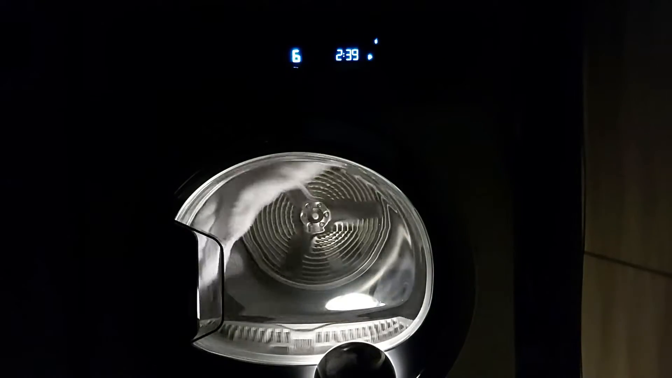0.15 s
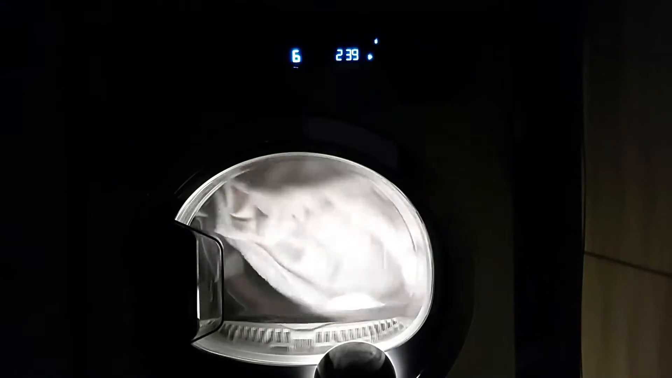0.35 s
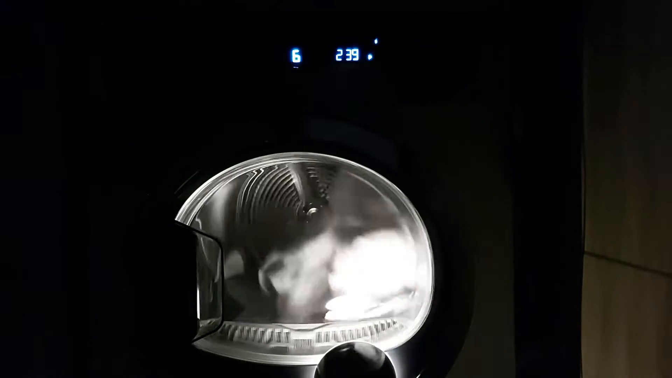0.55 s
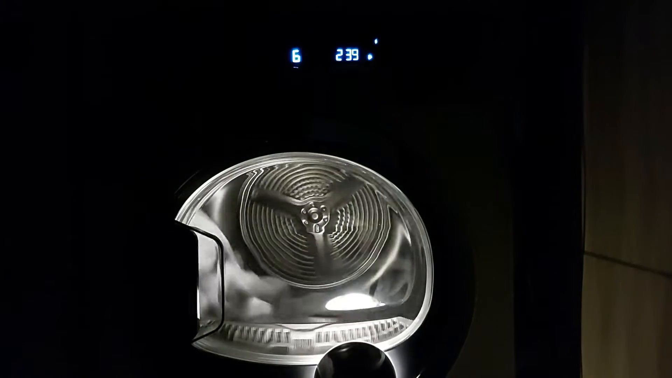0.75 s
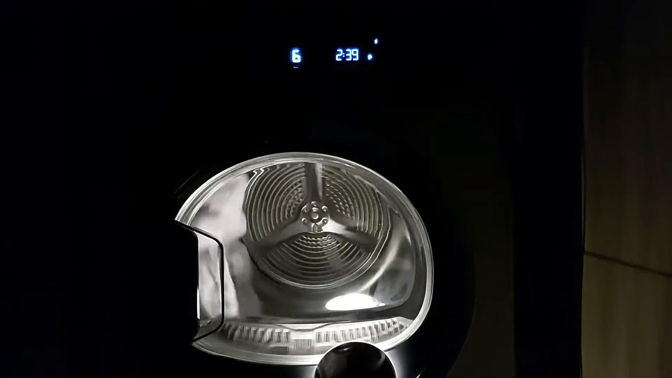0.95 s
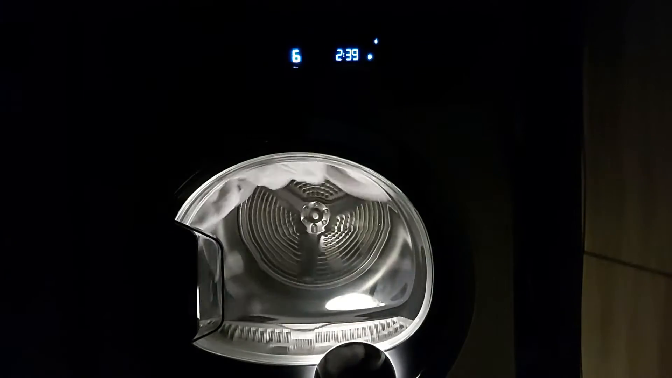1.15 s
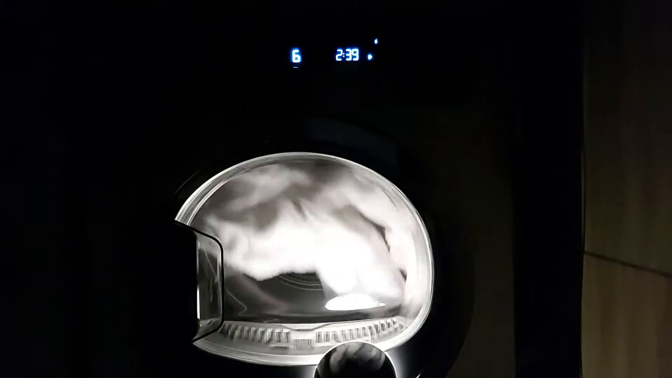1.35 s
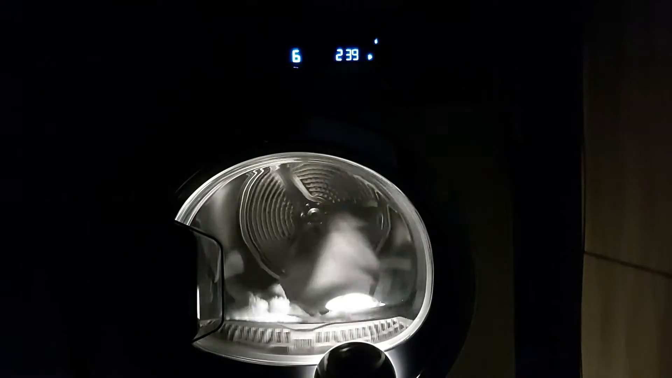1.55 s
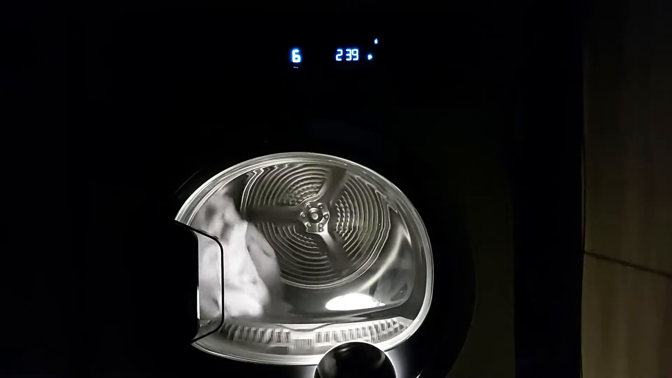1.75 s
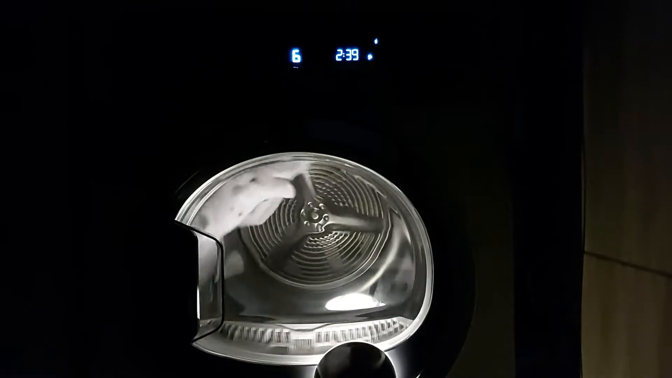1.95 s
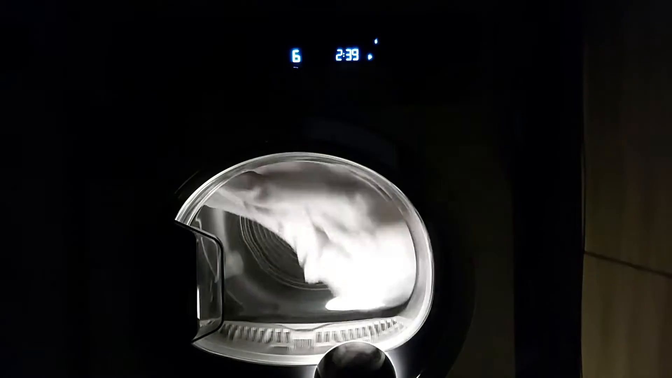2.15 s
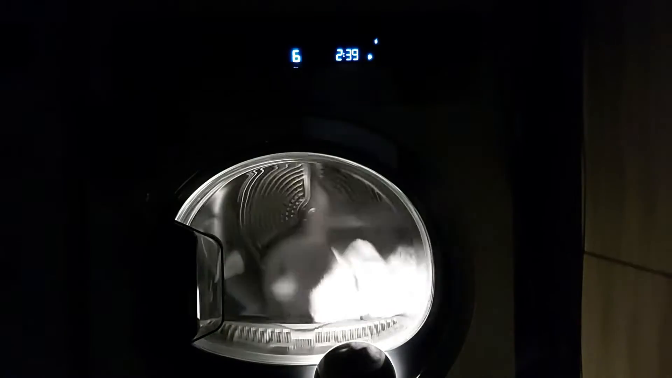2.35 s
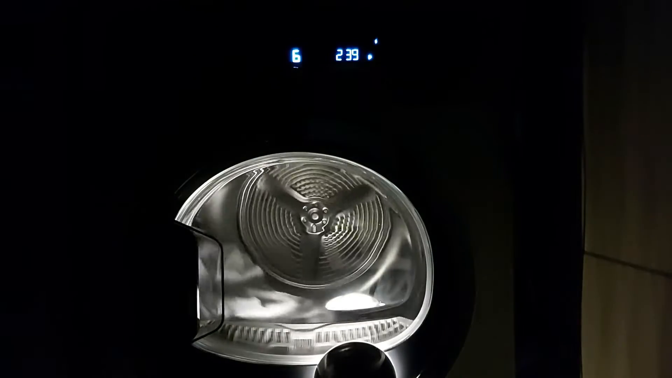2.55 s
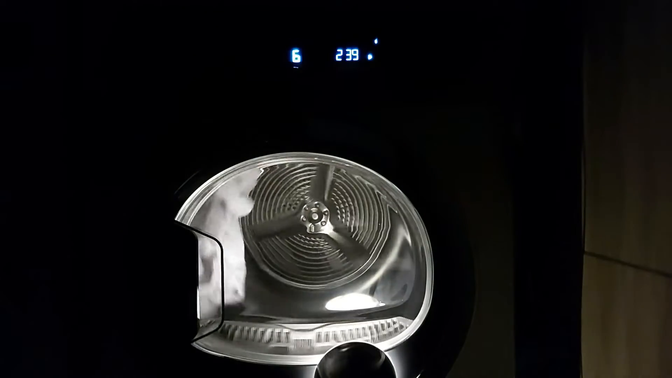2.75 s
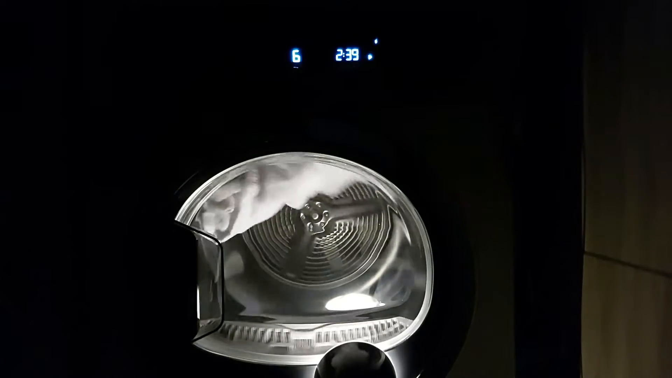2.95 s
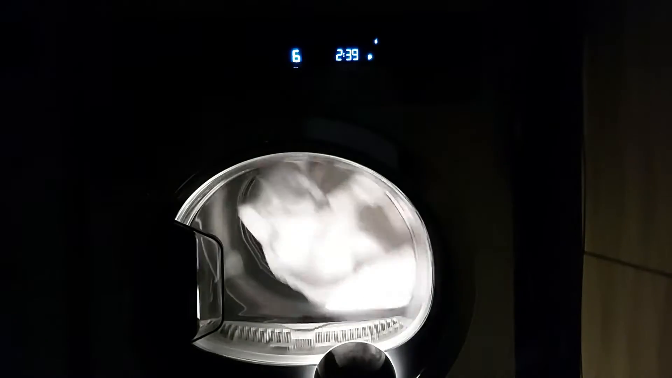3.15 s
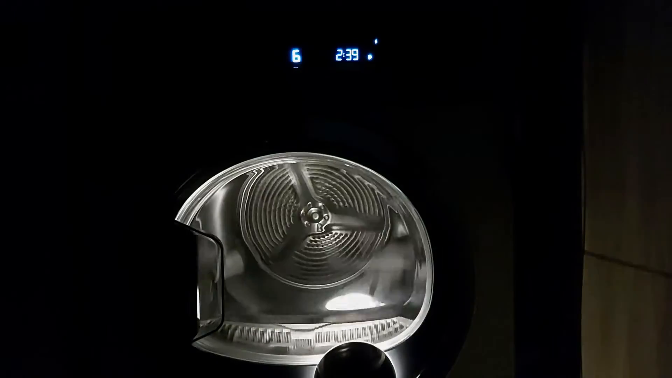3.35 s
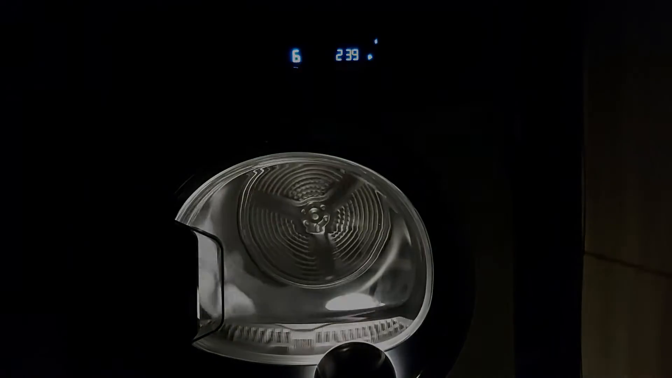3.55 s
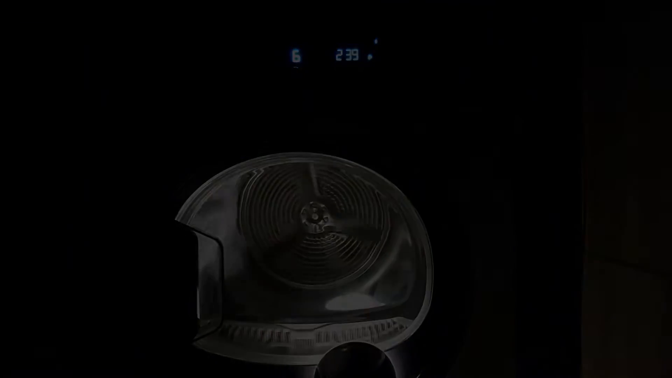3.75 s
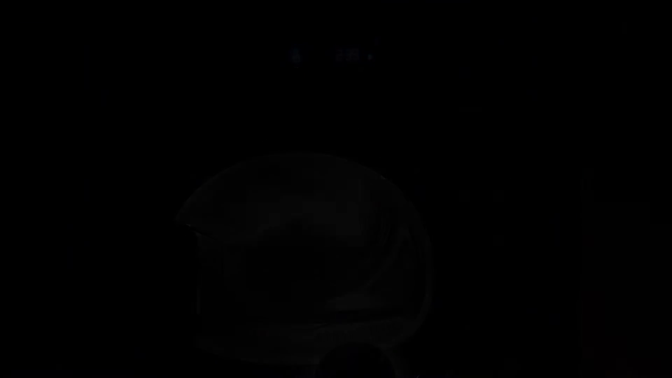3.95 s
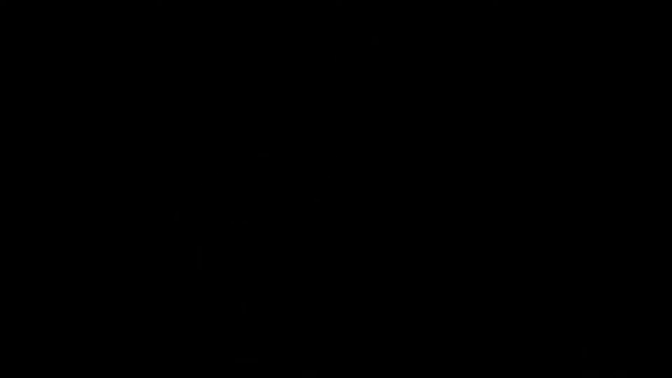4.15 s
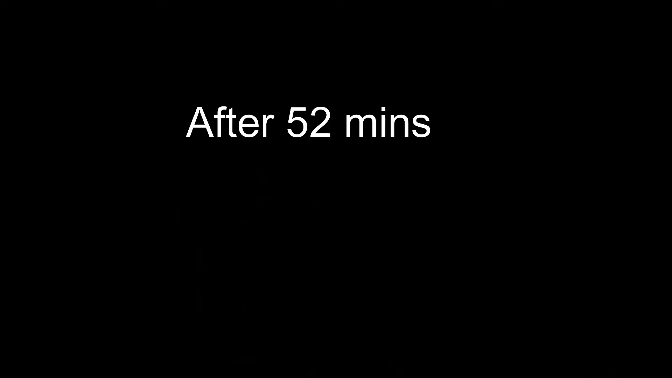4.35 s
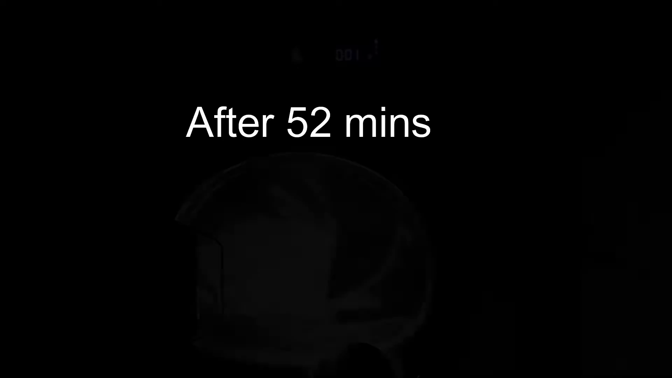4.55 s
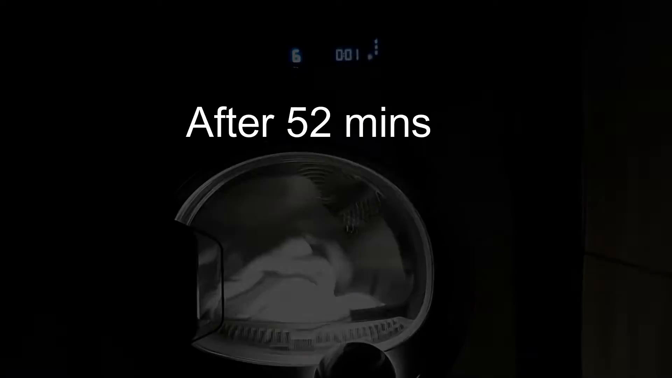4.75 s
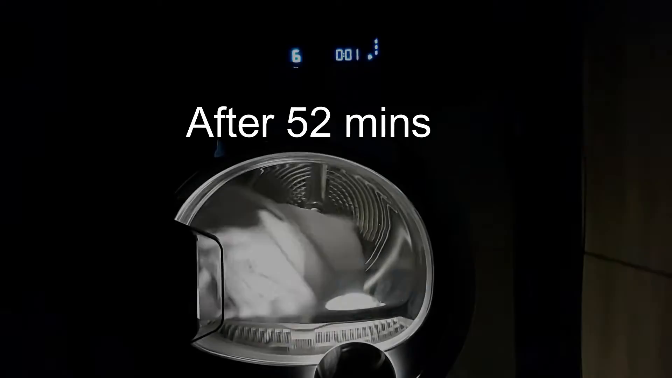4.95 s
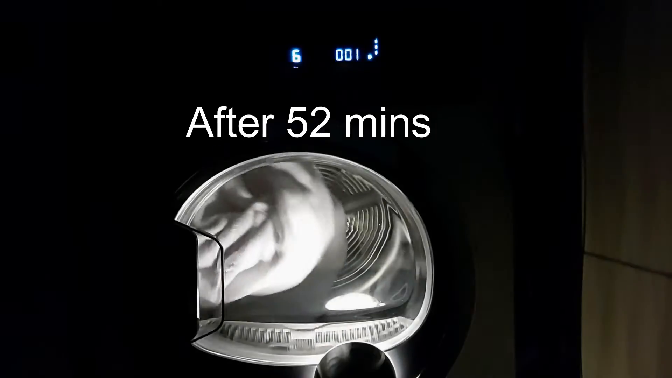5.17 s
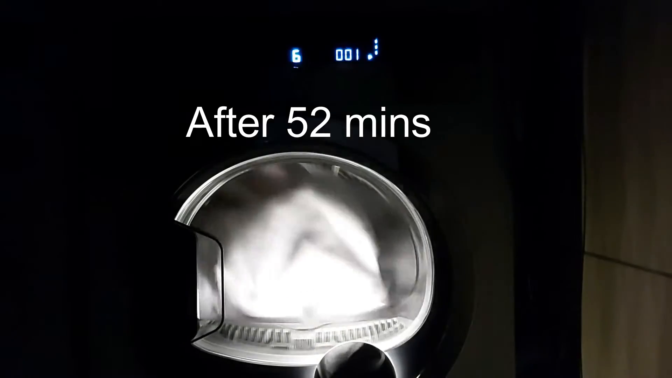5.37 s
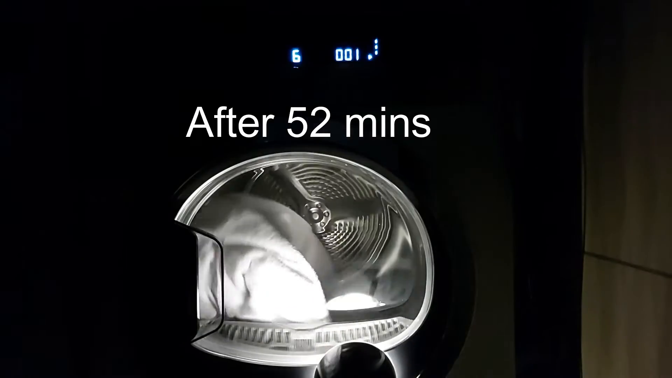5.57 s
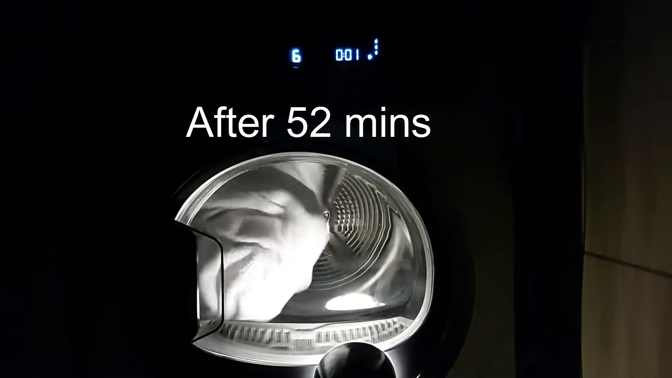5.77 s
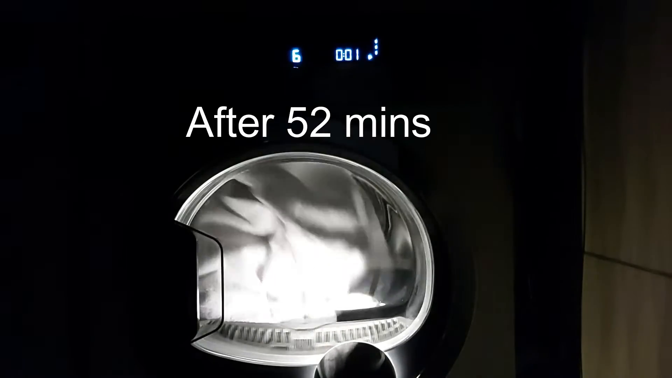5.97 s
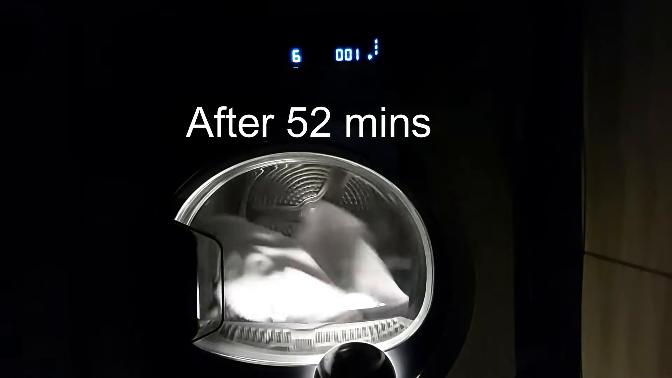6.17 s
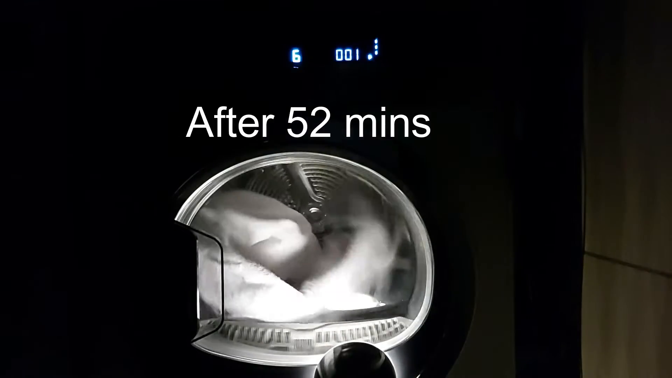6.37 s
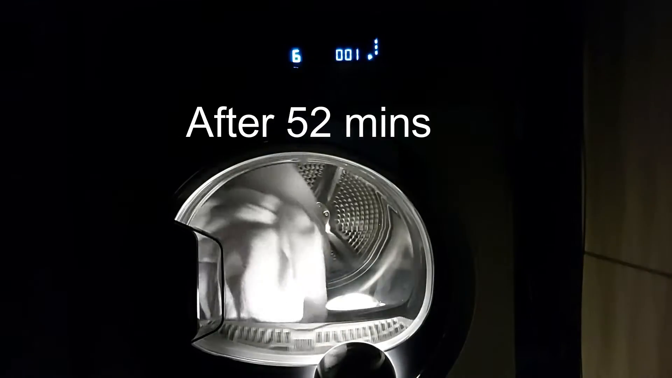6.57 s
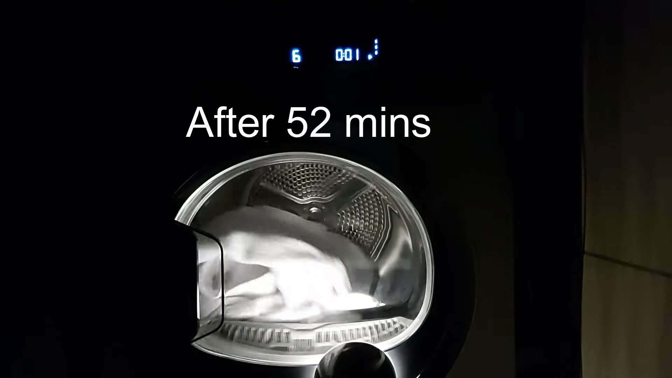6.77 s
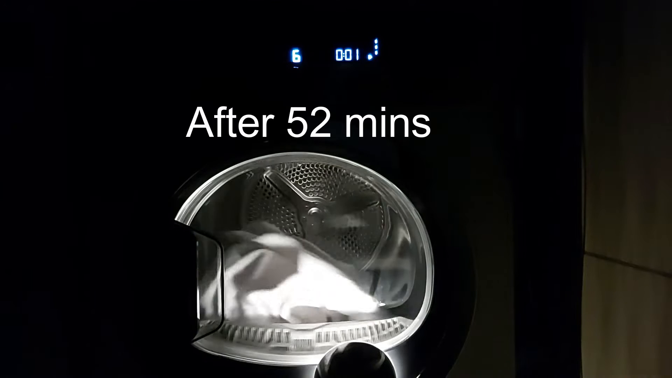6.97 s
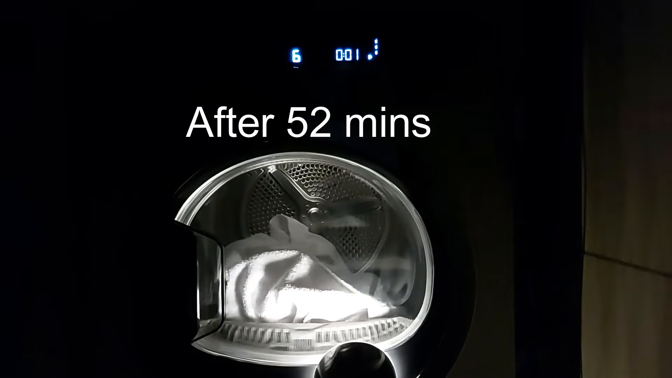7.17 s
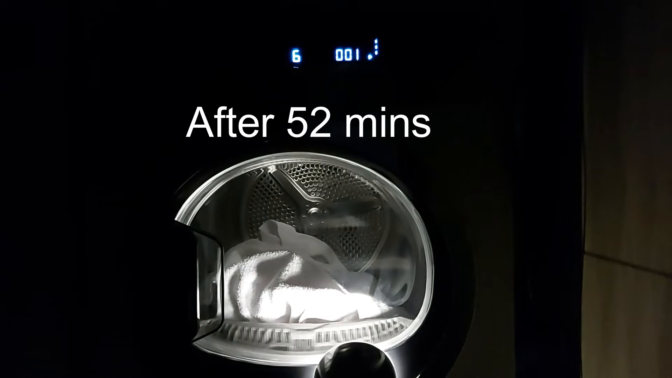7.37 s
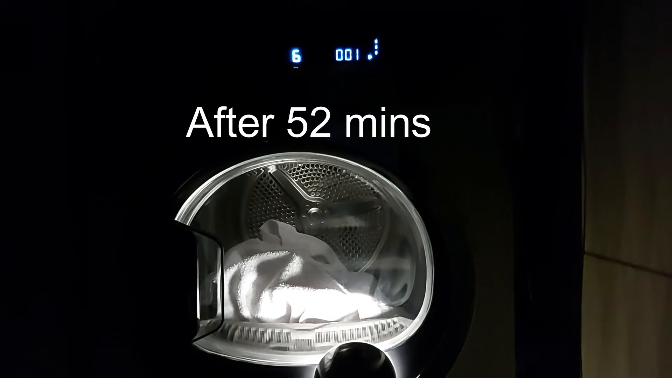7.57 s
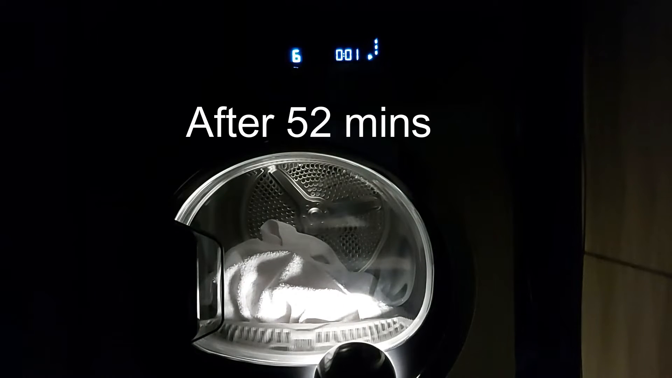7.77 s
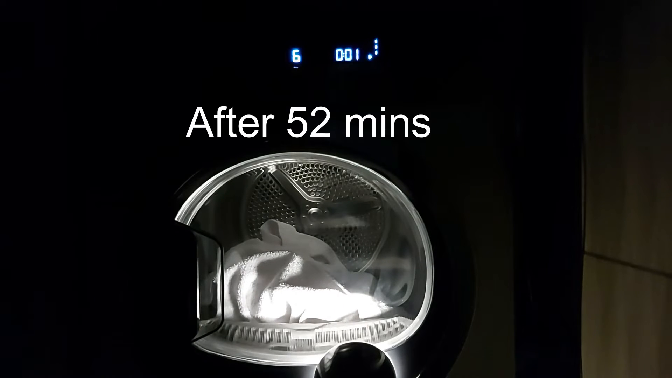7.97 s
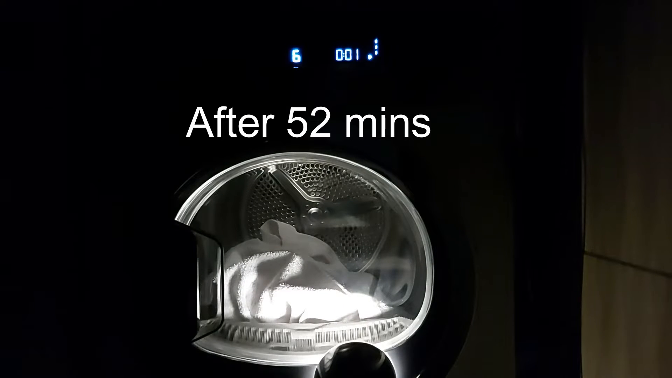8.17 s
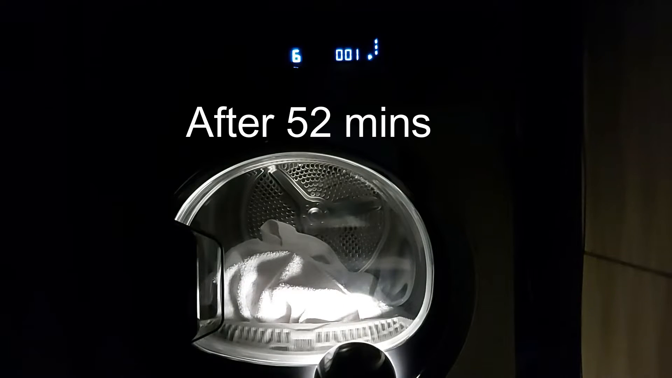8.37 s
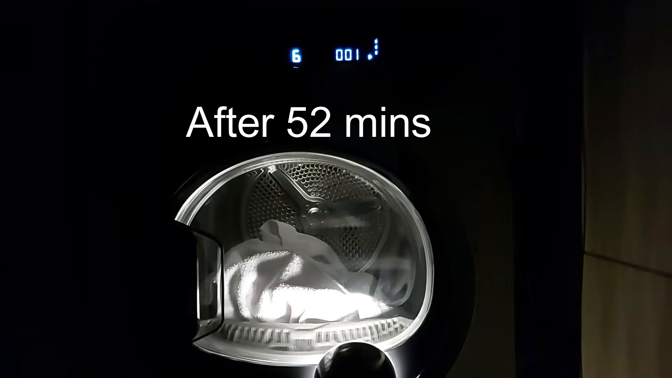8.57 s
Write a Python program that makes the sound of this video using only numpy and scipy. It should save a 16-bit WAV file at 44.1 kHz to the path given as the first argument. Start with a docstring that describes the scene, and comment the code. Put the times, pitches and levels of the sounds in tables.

```python
"""A tumble dryer runs in a small room: the drum shakes the cabinet, the fan drives air through ducts,
the motor whines and laundry thuds on the drum wall. The sound fades, breaks off briefly at 4.34 s
and resumes late in the cycle with more thuds. At 6.45 s the motor is switched off: drive whistles
converge, the load slides, drum and fan coast to rest. A faint hiss remains; cooling metal ticks."""
import sys
import numpy as np
from scipy import signal
from scipy.fft import rfft, irfft, next_fast_len
from scipy.io import wavfile

SR = 44100
rng = np.random.default_rng(int(sys.argv[2]) if len(sys.argv) > 2 else 0)


def log_audio(samples):
    """Write samples as a 16-bit WAV file to the path given in sys.argv[1]."""
    # one column per channel
    frames = np.atleast_2d(samples).T
    # limit to full scale, then quantise
    limited = np.clip(frames, -1, 1)
    pcm = np.round(limited * 32767).astype(np.int16)
    wavfile.write(sys.argv[1], SR, pcm)


N = 379877
TIME_S = np.arange(N) / SR

BREAK_S, RESUME_S = 4.342, 4.359  # early cycle before, late cycle after
DRIVE_ON_S, SWITCH_OFF_S, COAST_S, REST_S = 4.74, 6.45, 6.56, 7.33
SHAFT_HZ, SWITCHING_HZ, FAN_LAG_S = 48.89, 12231, 0.085

# cabinet and room resonances: freq_hz, width_hz, early_db, late_db
BOOM_MODES = [(38, 8, -17, -22.5), (50.3, 9.2, -14, -11), (74.9, 16, -4.5, -7.5), (101.76, 7.3, 0.5, 6.5),
              (122.1, 17.3, 0.5, 0.5), (150.3, 12, -13.5, -13.5)]
# boom swells as the load lurches: centre_s, level_db, half_length_s
LURCHES = [(5.9, -24, 0.095), (6.32, -20.5, 0.025), (6.6, -27, .06), (7.305, -54, 0.058)]
# air rush spectrum: freq_hz, density_db
RUSH_SPECTRUM = [(88, -33), (150, 0.5), (260, -2.5), (340, 0), (519, -9.5), (613, -4), (948, -9.5),
                 (1600, -14), (3200, -37.5), (4160, -77.5)]
# duct and drum resonances in the rush: freq_hz, width_hz, level_db
DUCT_MODES = [(192.3, 2.7, 5.5), (224.8, 16, 2), (301.6, 11.8, 2), (339.5, 38.5, 3), (436.6, 14, 2.5),
              (472.6, 11.6, 5), (696, 26.5, -0.5), (957, 9.4, 5.5)]
# hiss spectra (early, late, at rest), each: freq_hz, density_db
HISS_SPECTRA = [
    [(1470, -20.5), (2500, 3), (3090, -1), (5700, -3.5), (7100, -6.5), (12200, -8.5), (14500, -8.5)],
    [(1500, -18.5), (2500, 0), (3250, -6.5), (6430, -13), (10600, -20.5), (12300, -18), (14000, -22.5),
     (15500, -20)],
    [(700, -13.5), (2500, -7.5), (4100, -4.5), (11300, -4.5), (15500, -11)],
]
# hiss spectrum while coasting: freq_hz, density_db
COAST_SPECTRUM = [(1470, -31), (2500, -2), (3300, -14.5), (5900, -10.5), (6500, -10), (7200, -14.5),
                  (10100, -22), (12500, -13), (15700, -13.5)]
# hiss swells: centre_s, level_db, half_length_s
RUSTLES = [(5.66, -56, 0.3), (6.48, -53.5, 0.027)]
# hiss floor, heard at rest: time_s, level_db
HISS_FLOOR = [(7.33, -84), (7.96, -75), (8.04, -67), (8.61, -61.5)]
# laundry landings: start_s, level_db, length_s, treble_db, lowpass_hz
THUDS = [(1.653, -19.5, 0.067, -11, 1500), (1.708, -19, 0.023, -23, 900), (2.37, -30, 0.12, -10.5, 1500),
         (2.449, -26.5, 0.1, -17, 900), (4.624, -22, 0.09, -13.5, 1300), (4.77, -27, 0.079, -16, 1200),
         (4.899, -29.5, 0.061, -12.5, 1200), (5.548, -24, 0.054, -12, 880), (5.568, -15, 0.063, -32, 450),
         (5.666, -22.5, 0.074, -11, 1220), (5.745, -31.5, 0.19, -12, 1200),
         (6.214, -27, 0.075, -28.5, 1213), (6.356, -12, 0.072, -18, 1096), (6.556, -32.5, 0.044, -7, 1516),
         (6.568, -21, 0.063, -20.5, 750), (6.936, -39.5, 0.055, -13.5, 1800),
         (7.357, -62, 0.043, -13, 1500), (7.885, -52.5, 0.057, -16, 700), (8.011, -75.5, 0.061, 5, 1500)]
# drum wall modes: freq_hz, level_db, t60_s
DRUM_MODES = [(144.8, -3, 0.068), (246.9, -13.5, 0.4), (303.5, -15, 0.17), (355, -5, .1), (384, -4.5, 0.26),
              (435, -7.5, 0.17), (487, -14, 0.36), (569, -2, 0.081), (666.7, -9, 0.25), (745, -1.5, 0.079),
              (849, 8.5, 0.02), (1168, -4.5, 0.1)]
# cloth flap resonances: freq_hz, width_hz, level_db
CLOTH_MODES = [(1325, 100, -2), (1505, 130, -1), (1884, 300, -4.5), (2550, 670, -9.5)]
# motor run-down: time_s, speed_ratio
RUN_DOWN = [(6.45, 1), (6.61, .69), (6.83, .52), (7.2, .05), (7.26, .003), (7.3, 0)]
# shaft and drive tones, early cycle: pitch_hz, level_db
EARLY_TONES = [(1321, -58), (1369, -57), (1865, -66), (11820, -72), (12625, -77), (15116, -66),
               (15719, -59)]
# shaft and drive tones, late cycle: pitch_hz, level_db
LATE_TONES = [(1459, -59), (1809, -67), (2681, -72), (15186, -76), (15730, -74)]
# squeal swells: centre_s, level_db, half_length_s
SQUEAL_SWELLS = [(.72, -50.5, 0.11), (2.43, -47, 0.049), (2.92, -48.5, 0.038), (3.36, -48.5, 0.13)]
# envelope of the high shaft orders: freq_hz, level_db
ORDER_SPECTRUM = [(3150, -88), (3560, -70), (3950, -83), (4290, -74), (4900, -84), (5300, -76), (5850, -74),
                  (6900, -85), (10500, -87)]
# upper whistle boost while braking: time_s, gain_db
BRAKE_BOOST = [(6.53, 0), (6.61, 12), (6.77, 11), (6.84, 1)]
# thin braking tone: pitch_hz, centre_s, level_db, half_length_s
BRAKE_TONE = (8554, 6.69, -83, .12)
# cooling metal: start_s, level_db
TICKS = [(8.456, -42), (8.4777, -43), (8.542, -43.5)]
# quiet room spectrum: freq_hz, density_db
ROOM_SPECTRUM = [(82, -32.5), (140, -1), (379, -4.5), (808, -11.5), (1520, -9), (4000, -25), (5600, -76)]
# stereo balance: freq_hz, left_minus_right_db
BALANCE = [(60, -6), (110, -3.5), (200, -7), (380, -5.5), (700, -2), (1290, -4), (2380, -5), (4400, -4.5),
           (15000, -2)]
# stereo phase: freq_hz, left_lead_rad
LEFT_LEAD = [(0, 0), (400, -.4), (900, -.5), (1380, -3.2), (2930, -8.4), (5600, -19), (16700, -25)]
# likeness of left and right: freq_hz, coherence_ratio
COHERENCE = [(60, .995), (200, .975), (400, .8), (800, .48), (1500, .4), (3000, .22), (15000, .28)]


def cabinet_boom(tumble):
    """The rolling drum shakes cabinet and room modes; the load makes them flutter and swell."""
    modes = np.array(BOOM_MODES)
    early = noise(lambda hz: np.sqrt(peaks(modes[:, [0, 1, 2]], hz)))
    late = noise(lambda hz: np.sqrt(peaks(modes[:, [0, 1, 3]], hz)))
    running = amp(early_late(-26.5, -29.5)) * speed() ** 1.47
    gain = np.sqrt(running ** 2 + amp(-76) ** 2 + swells(LURCHES))
    return gain * amp(0.14 * tumble) * early_late(early, late)


def air_rush(tumble):
    """The fan drives air through resonant ducts and runs down after the drum."""
    rush = noise(lambda hz: amp(at_hz(RUSH_SPECTRUM, hz)) * np.sqrt(0.69 + peaks(DUCT_MODES, hz)))
    gain = amp(early_late(-32.5, -35.5)) * speed(FAN_LAG_S) ** 1.47
    flutter_db = 0.6 * tumble + 0.5 * drift(18)
    return gain * amp(flutter_db) * rush


def air_hiss(tumble):
    """Hiss dies with the fan, down to a faint floor that rises toward the end."""
    early, late, at_rest, coasting = [noise(lambda hz: amp(at_hz(spectrum, hz)))
                                      for spectrum in [*HISS_SPECTRA, COAST_SPECTRUM]]
    early *= 1 + 0.054 * np.sin(2 * np.pi * SHAFT_HZ * TIME_S)  # one throb per shaft turn
    stages = [TIME_S < RESUME_S, TIME_S < COAST_S, TIME_S < REST_S]
    hiss = np.select(stages, [early, late, coasting], at_rest)
    running = amp(early_late(-52.5, -53.5)) * off_decay(db_per_s=20) * speed(FAN_LAG_S) ** 0.42
    gain = np.sqrt(running ** 2 + amp(curve(HISS_FLOOR)) ** 2 + swells(RUSTLES))
    flutter_db = 0.39 * tumble + 0.65 * drift(10)
    return gain * amp(flutter_db) * hiss


def laundry_thuds():
    """Each slap is a dense run of soft contacts: drum modes ring, cloth flaps above them."""
    size = 8000
    t = np.arange(size) / SR
    push, flap = np.zeros((2, 2, N + size))
    for start_s, level_db, length_s, treble_db, lowpass_hz in THUDS:
        contacts = unit_rms(rng.standard_normal((2, size)) * amp(2 * rng.exponential(1, size)))
        first_blow = 0.4 * np.exp(-t / 0.008)
        attack = 1 - np.exp(-t / 0.002)
        slap = contacts * attack * (np.exp(-(t / length_s) ** 2) + first_blow)
        at = round(start_s * SR)
        push[:, at:at + size] += amp(level_db) * butter(slap, 2, lowpass_hz, "low")
        flap[:, at:at + size] += amp(level_db + treble_db) * slap
    drum = sum(amp(db) * ring(push[:, :N], hz, t60_s) for hz, db, t60_s in DRUM_MODES)
    cloth = sum(amp(db) * ring(flap[:, :N], hz, 1.4 / width_hz) for hz, width_hz, db in CLOTH_MODES)
    return butter(amp(-35) * drum + amp(-15.5) * cloth, 4, [130, 2500], "band")


def motor_whine():
    """Shaft and drive tones waver as the load shifts; a squeal swells early in the cycle."""
    squeal_gain = np.sqrt(amp(-56.5) ** 2 + swells(SQUEAL_SWELLS))
    early = squeal_gain * tone(1563, 0, waver_db=0.64) + shaft_orders()
    early += sum(tone(hz, db, waver_db=3 if hz < 8000 else 0.7) for hz, db in EARLY_TONES)
    late = sum(tone(hz, db, waver_db=3) for hz, db in LATE_TONES) * off_decay(db_per_s=200)
    drive_on = np.clip((TIME_S - DRIVE_ON_S) / 0.04, 0, 1)
    return early_late(early, drive_on * (late + drive_whistle()))


def shaft_orders():
    """Multiples of the shaft rate, each with its own level, phase and side."""
    orders = np.arange(60, 215)
    order_db = at_hz(ORDER_SPECTRUM, SHAFT_HZ * orders) + rng.normal(0, 2.5, len(orders))
    gains = amp(order_db + rng.normal(0, 1, (2, len(orders))))
    phases_rad = rng.uniform(0, 2 * np.pi, len(orders)) + rng.uniform(0, 1.4, gains.shape)
    one_turn = np.linspace(0, 1, 4097)
    waves = [gain @ np.sin(2 * np.pi * np.outer(orders, one_turn) + phase[:, None])
             for gain, phase in zip(gains, phases_rad)]
    turn = np.cumsum(SHAFT_HZ * (1 + 0.00012 * drift(1.9))) / SR % 1
    return np.array([np.interp(turn, one_turn, wave) for wave in waves]) * amp(drift(2.8))


def drive_whistle():
    """Two sidebands close in on the switching rate as the motor slows; braking adds a thin tone."""
    spread_hz = 377 * speed()
    upper = speed() ** 0.8 * tone(SWITCHING_HZ + spread_hz, -75 + curve(BRAKE_BOOST), waver_db=3.5)
    lower = speed() ** 0.6 * tone(SWITCHING_HZ - spread_hz, -77, waver_db=3.5)
    brake_hz, *brake_swell = BRAKE_TONE
    brake = np.sqrt(swells([brake_swell])) * tone(brake_hz, 0, waver_db=1.7)
    return (upper + lower + brake) * (TIME_S < REST_S)


def laundry_slide():
    """The load rubs along the wall from switch-off until the drum stands."""
    rubbing = np.clip((TIME_S - SWITCH_OFF_S) / 3.15, 0, 1) * speed() ** 0.21
    return rubbing * amp(-57.5 + 2.5 * drift(25)) * noise(lambda hz: np.sqrt(peaks(CLOTH_MODES, hz)))


def metal_ticks():
    """Cooling metal: a sharp crack with a short room tail."""
    size = 4000
    t = np.arange(size) / SR
    envelope = 0.4 * np.exp(-t / 0.00052) + 0.31 * np.exp(-t / 0.021)
    out = np.zeros((2, N + size))
    for start_s, level_db in TICKS:
        crack = rng.standard_normal((2, size)) * envelope
        at = round(start_s * SR)
        out[:, at:at + size] += amp(level_db) * butter(crack, 2, [2850, 13000], "band")
    return out[:, :N]


def room_tone():
    """Steady noise of the quiet room."""
    return amp(-77.5) * noise(lambda hz: amp(at_hz(ROOM_SPECTRUM, hz)))


def speed(lag_s=0):
    """Share of full motor speed, delayed by lag_s."""
    return curve([(time_s + lag_s, ratio) for time_s, ratio in RUN_DOWN])


def off_decay(db_per_s):
    """Gain falling from switch-off."""
    return amp(-db_per_s * np.maximum(TIME_S - SWITCH_OFF_S, 0))


def early_late(early, late):
    """Switch values at the end of the break."""
    return np.where(TIME_S < RESUME_S, early, late)


def swells(rows):
    """Summed power of bell-shaped swells."""
    return sum(amp(db) ** 2 * np.exp(-((TIME_S - at_s) / half_s) ** 2) for at_s, db, half_s in rows)


def peaks(modes, hz):
    """Summed power of resonance peaks."""
    return sum(amp(db) ** 2 / (1 + (2 * (hz - mode_hz) / width_hz) ** 2) ** 2
               for mode_hz, width_hz, db in modes)


def tone(pitch_hz, level_db, waver_db):
    """Wavering stereo sine, slightly right, with a random phase lead on the left."""
    phase_rad = 2 * np.pi * np.cumsum(pitch_hz + 1.5 * drift(3)) / SR
    lead_rad = rng.uniform(0, np.pi / 3, (2, 1)) * [[1], [0]]
    gain = np.sqrt(2) * amp(level_db + waver_db * drift(4)) * amp([[-0.8], [0.8]])
    return gain * np.sin(phase_rad + lead_rad)


def ring(force, hz, t60_s):
    """Damped mode; a unit click rings at height 1."""
    r, w = amp(-60 / (t60_s * SR)), 2 * np.pi * hz / SR
    return signal.lfilter([0, np.sin(w)], [1, -2 * r * np.cos(w), r * r], force + 1e-18)


def noise(colour):
    """Two independent noises with amplitude spectrum colour(hz), rms 1."""
    size = next_fast_len(N)
    hz = np.arange(size // 2 + 1) * SR / size
    real, imaginary = rng.standard_normal((2, 2, len(hz)))
    return unit_rms(irfft((real + 1j * imaginary) * colour(hz), size)[:, :N])


def drift(rate_hz):
    """Slow random curve, rms 1."""
    hop = 40
    r = np.exp(-2 * np.pi * rate_hz * hop / SR)
    slow = signal.lfilter([1], [1, -2 * r, r * r], rng.standard_normal(N // hop + 2002))[2000:]
    return np.interp(np.arange(N) / hop, np.arange(len(slow)), unit_rms(slow))


def stereo_image(pair):
    """Give two independent signals the coherence, phase and balance of two microphone ports."""
    size = next_fast_len(N)
    hz = np.arange(size // 2 + 1) * SR / size
    common, separate = rfft(pair, size)
    coherence = at_hz(COHERENCE, hz)
    lead = np.exp(1j * np.interp(hz, *np.transpose(LEFT_LEAD)))
    tilt = amp(at_hz(BALANCE, hz) / 2)
    left = coherence * lead * common + np.sqrt(1 - coherence ** 2) * separate
    return irfft([left * tilt, common / tilt], size)[:, :N]


def curve(points):
    """Time table, per sample."""
    return np.interp(TIME_S, *np.transpose(points))


def at_hz(points, hz):
    """Spectrum table on a log axis."""
    freq_hz, values = np.transpose(points)
    return np.interp(np.log(hz + 1), np.log(freq_hz + 1), values)


def butter(x, order, edge_hz, kind):
    return signal.sosfilt(signal.butter(order, edge_hz, kind, fs=SR, output="sos"), x)


def amp(db):
    return 10 ** (np.asarray(db) / 20)


def unit_rms(x):
    return x / np.sqrt(np.mean(x ** 2) + 1e-20)


def scene():
    """All sources; the level fades into a near-silent break and back."""
    tumble = drift(9.4)  # shared flutter from the load
    machine = cabinet_boom(tumble) + air_rush(tumble) + air_hiss(tumble)
    noises = machine + laundry_thuds() + laundry_slide() + room_tone()
    mix = stereo_image(noises) + motor_whine() + metal_ticks()
    gate = np.clip(np.maximum(BREAK_S - TIME_S, TIME_S - RESUME_S) / 0.0005, amp(-36), 1)
    fade_db = curve([(BREAK_S - 0.64, 0), (BREAK_S, -5.5), (RESUME_S, -5), (RESUME_S + 0.3, 0)])
    return mix * gate * amp(fade_db)


def record(dry):
    """Microphone: bass cut at 32 Hz, steep top cut at 15790 Hz."""
    top_cut = signal.ellip(14, 0.3, 75, 15790, fs=SR, output="sos")
    return signal.sosfilt(top_cut, butter(dry, 2, 32, "high"))


dry = scene()
out = record(dry)
log_audio(out)
```